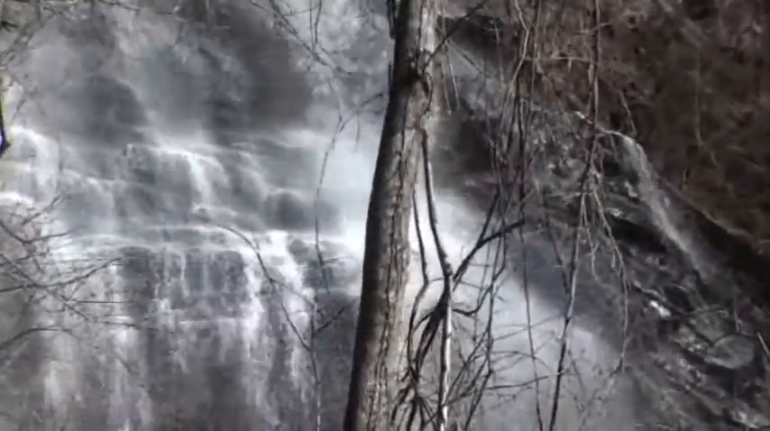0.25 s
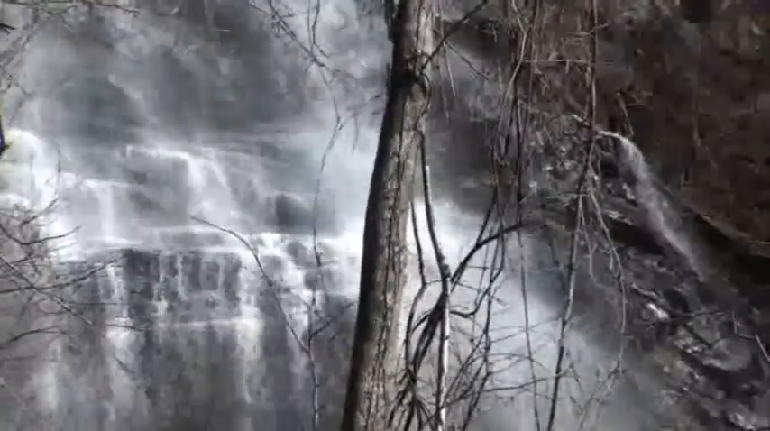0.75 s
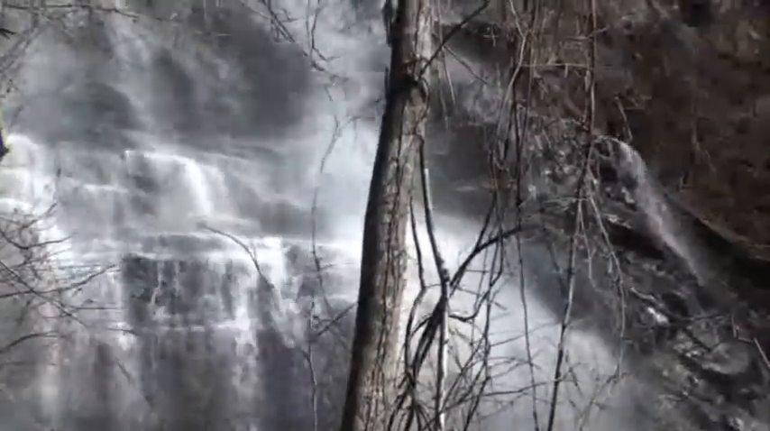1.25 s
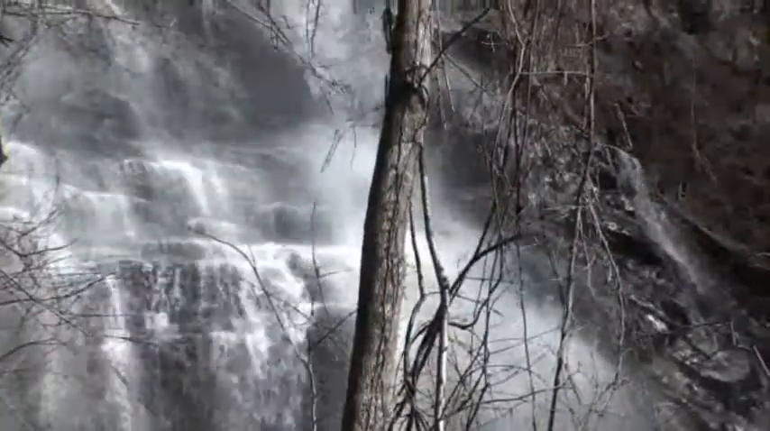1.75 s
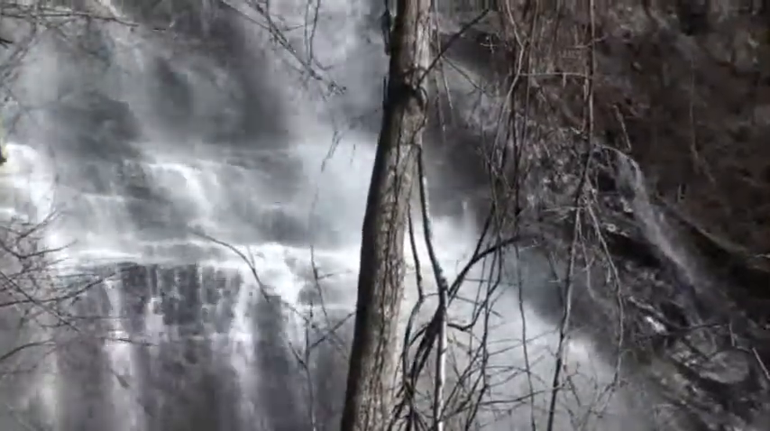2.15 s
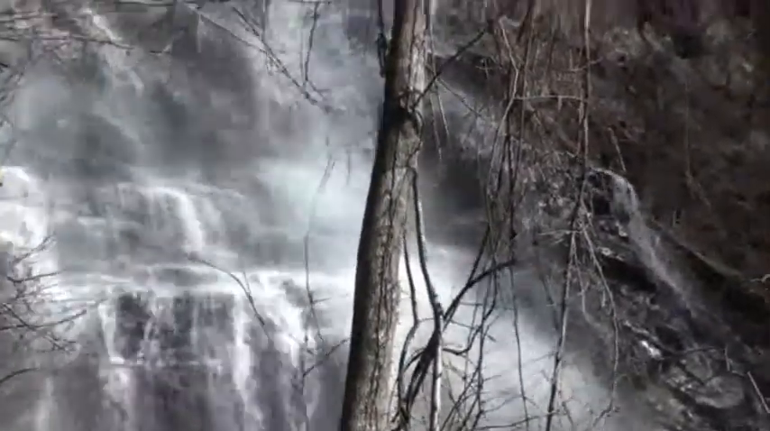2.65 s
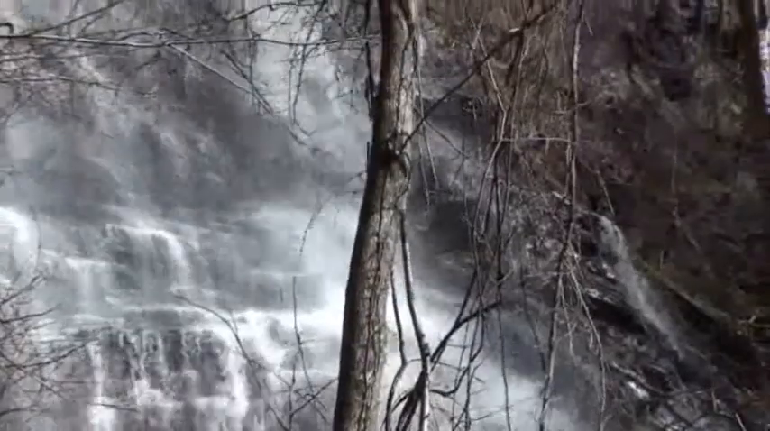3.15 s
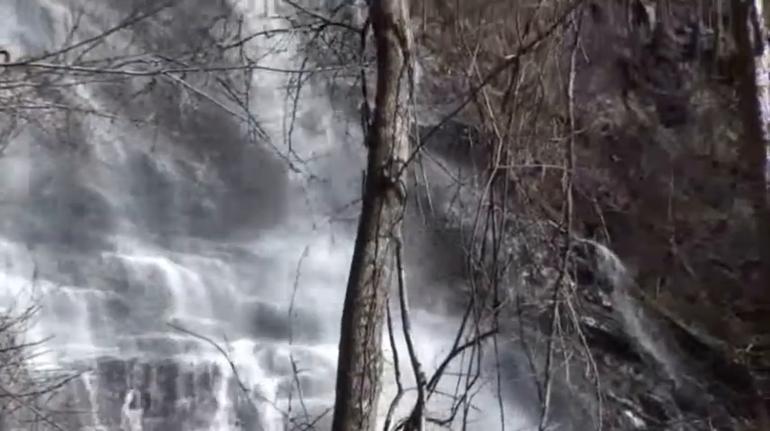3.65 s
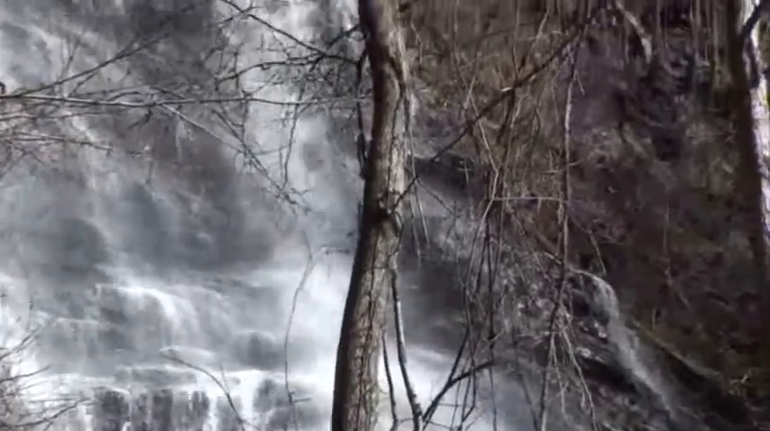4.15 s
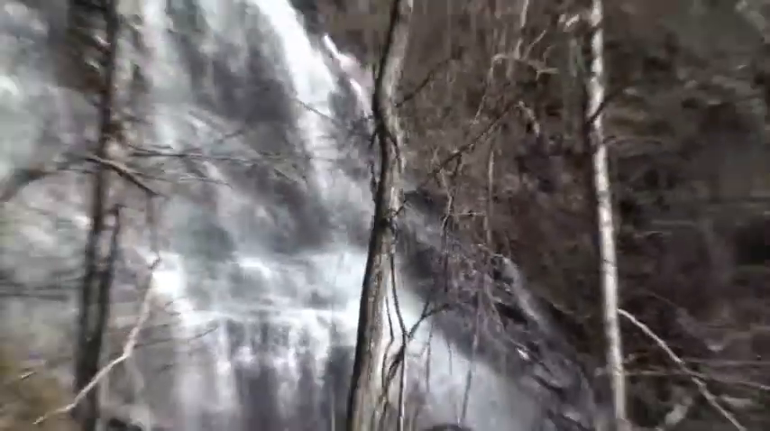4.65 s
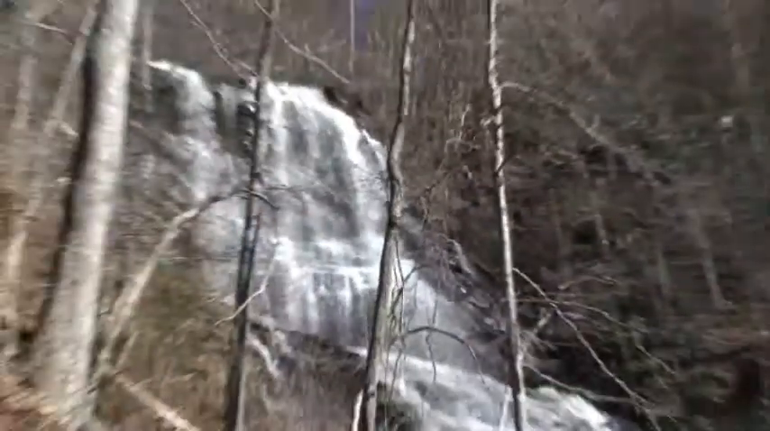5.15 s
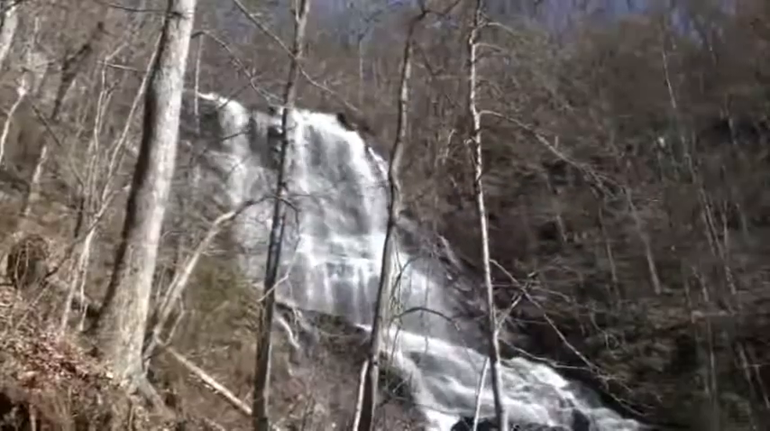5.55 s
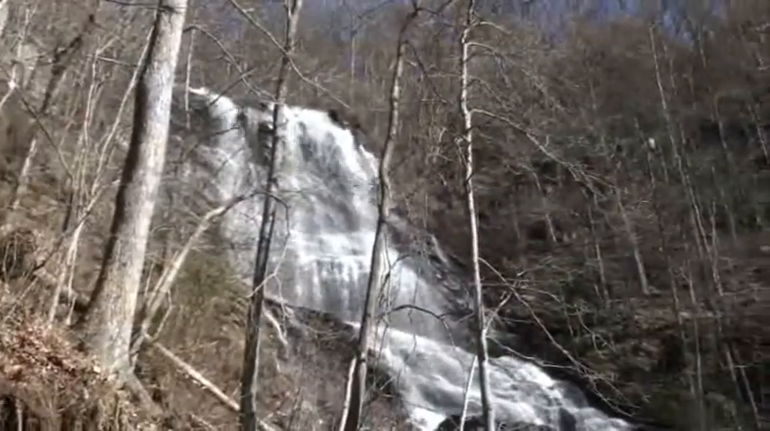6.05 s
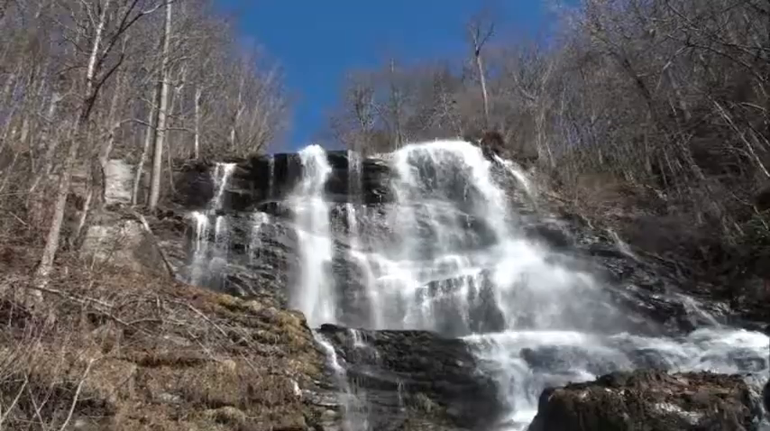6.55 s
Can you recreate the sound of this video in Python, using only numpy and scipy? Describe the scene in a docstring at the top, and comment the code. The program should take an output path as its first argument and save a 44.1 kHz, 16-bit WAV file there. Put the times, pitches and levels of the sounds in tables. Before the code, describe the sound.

From the start, a large waterfall roars loudly and steadily outdoors in a valley. Countless splashes on rock ledges and bubbling water blend into one dense rush, with a slight flutter in the low range and a smooth hiss of spray above it. The microphone is tightly focused, so the sound is almost mono and near the centre. From about 4.8 to 5.5 seconds the roar fades to a clearly softer level and widens, letting in more diffuse echo from the valley sides. It holds there, even and unbroken, until about 6.6 seconds. Then it drops out for a split second and comes straight back from a spot below the falls: somewhat louder, with a deeper rumble, and placed more to the right. This heavier roar continues for the brief remainder.

```python
"""The loud, steady roar of a large waterfall: countless splashes on rock ledges and bubbles
superpose into broadband noise, with a diffuse echo from the valley sides. A zoom microphone
hears it almost mono, then softer and wider as its beam opens. After a brief dip the scene
cuts to a second standpoint, with a deeper rumble and the water more to the right."""
import sys
import numpy as np
from scipy import signal
from scipy.fft import rfft, irfft
from scipy.io import wavfile
from scipy.ndimage import uniform_filter1d

SR = 44100
rng = np.random.default_rng(int(sys.argv[2]) if len(sys.argv) > 2 else 0)


def generate_wav(sig):
    """Save sig (samples, or channels by samples) to the path in sys.argv[1] as 16-bit PCM at SR."""
    pcm = np.round(np.clip(np.atleast_2d(sig).T, -1, 1) * 32767).astype(np.int16)
    wavfile.write(sys.argv[1], SR, pcm)


N = 300321


def water(splash_db=-7, surge_db=0.32, sheet_db=0.12, flicker_db=0.36):
    """Amplitude modulation: clumps of water surge in the low octaves while fine spray stays smooth."""
    bubble_wash = rng.standard_normal(N)
    source = rfft(bubble_wash + undb(splash_db) * splashes(per_s=8000, spread_db=2.5))
    surge, sheets = fluctuation(rate_hz=7), fluctuation(rate_hz=30)
    octave = np.clip(np.log2(bin_hz() / 60), 0, 8)
    roar = 0
    for k in range(9):
        band = irfft(source * np.maximum(1 - abs(octave - k), 0), N)
        clumping = 1 / (1 + (k / 6) ** 4)
        # sheets of water slap a ledge in all bands at once; each bubble size also flickers alone
        flicker = fluctuation(rate_hz=14)
        roar = roar + band * undb(sheet_db * sheets + clumping * (surge_db * surge + flicker_db * flicker))
    return roar


def splashes(per_s, spread_db):
    """Shot noise: random impacts on rock, most small, each scattering into droplets for a few ms."""
    hits = rng.random(N) < per_s / SR
    sizes = undb(spread_db * np.minimum(rng.exponential(size=N), 5))
    t = np.arange(400) / SR
    droplets = rfft(rng.standard_normal(len(t)) * np.exp(-t / .002), N)
    impacts = rfft(hits * sizes * rng.standard_normal(N))
    clicks = irfft(impacts * droplets / abs(droplets), N)  # all-pass: smeared in time, not coloured
    return clicks / np.std(clicks)


def waterfall(spectrum, scatter, reflection=0, comb_hz=262):
    """Direct and diffuse fields: the roar is in phase in both channels, the valley's echo in antiphase."""
    direct = colour(water(), spectrum)
    diffuse = colour(water(), spectrum)
    # comb filtering: a nearby surface repeats the echo one short path later
    diffuse = diffuse + reflection * np.roll(diffuse, int(SR / comb_hz))
    side = colour(unit_rms(diffuse), scatter)
    return unit_rms(direct) + side * np.array([[1], [-1]])


# Spectrum of the roar in the narrow beam: f/Hz, level/dB
NARROW_ROAR = [(15, -65), (25, -41), (64, -15.5), (222, -4), (348, -2), (376, -2), (766, -0.5),
               (1560, -2.5), (2200, -5.5), (2380, -5.5), (6990, -12.5), (9840, -18), (11500, -20.5),
               (13500, -31.5)]
# Valley scatter relative to that roar: f/Hz, level/dB
NARROW_ECHO = [(110, -51), (220, -21.5), (400, -24.5), (780, -16), (1200, -17.5), (1700, -49), (5000, -35),
               (12000, -24)]


def narrow_beam(level_db=-19):
    """High directivity rejects most of the diffuse field: the roar is loud and almost mono."""
    return waterfall(NARROW_ROAR, NARROW_ECHO, reflection=.45) * pan(-.3) * undb(level_db)


# Spectrum of the roar in the wide beam: f/Hz, level/dB
WIDE_ROAR = [(15, -42), (25, -26), (91, -6.5), (135, -5.5), (162, -3.5), (297, -4), (573, -4), (620, -3.5),
             (1370, -4), (1520, -5), (1780, -6), (6990, -14.5), (13500, -27.5)]
# Valley scatter relative to that roar: f/Hz, level/dB
WIDE_ECHO = [(70, -34), (200, -24), (700, -12), (1400, -10.5), (6000, -14), (11000, -8), (12500, -31)]


def wide_beam(level_db=-27.5):
    """Low directivity admits a larger share of the diffuse field: the roar is softer and wider."""
    return waterfall(WIDE_ROAR, WIDE_ECHO, reflection=.1) * pan(-.55) * undb(level_db)


def first_standpoint(t, zoom_start_s=4.82, travel_s=.7):
    """Incoherent powers add: the narrow beam fades into the wide one as the zoom pulls back."""
    zoom = np.clip(1 - (t - zoom_start_s) / travel_s, 0, 1)
    return zoom * narrow_beam() + np.sqrt(1 - zoom ** 2) * wide_beam()


# Spectrum of the roar below the falls: f/Hz, level/dB
CASCADE_ROAR = [(25, -45), (50, -19), (115, -4.5), (190, -4), (320, 0), (540, -3), (750, -7), (1000, -6),
                (1500, -8.5), (2700, -9), (4000, -15), (6500, -14), (10000, -20.5), (12000, -24),
                (13500, -33)]
# Valley scatter relative to that roar: f/Hz, level/dB
CASCADE_ECHO = [(60, -21), (250, -18), (700, -9), (1400, -7), (11000, -8), (12500, -18)]


def lower_cascade(level_db=-22.5):
    """Intensity stereophony: heard from below the falls, the rumbling cascade lies to the right."""
    return waterfall(CASCADE_ROAR, CASCADE_ECHO) * pan(-3) * undb(level_db)


def fluctuation(rate_hz):
    """Low-pass noise: random steps, averaged twice, with unit standard deviation."""
    hold = max(int(SR / rate_hz), 2)
    steps = rng.standard_normal(2048)[np.arange(N) // hold % 2048]
    smooth = uniform_filter1d(uniform_filter1d(steps, hold), hold)
    return (smooth - smooth.mean()) / smooth.std()


def colour(x, points):
    """Zero-phase filtering by a gain curve interpolated over log frequency."""
    hz, db = np.transpose(points)
    return irfft(rfft(x) * undb(np.interp(np.log(bin_hz()), np.log(hz), db)), N)


def unit_rms(x):
    """Normalisation to rms 1 above 300 Hz."""
    return x / np.std(irfft(rfft(x) * (bin_hz() > 300), N))


def pan(db):
    """Amplitude panning: channel gains for a left-minus-right level in dB."""
    return undb(np.array([[db], [-db]]) / 2)


def undb(db):
    """Amplitude ratio of a level in dB."""
    return 10 ** (np.asarray(db) / 20)


def bin_hz():
    """Fourier bin frequencies, at least 1 Hz."""
    return np.maximum(np.arange(N // 2 + 1) * SR / N, 1)


def scene(cut_s=6.6243, resume_s=6.6295, fade_s=.012):
    """Gating: the first standpoint stops dead; the second fades in a few milliseconds later."""
    t = np.arange(N) / SR
    fade_in = np.clip((t - resume_s) / fade_s, .06, 1)
    return np.where(t < cut_s, first_standpoint(t), lower_cascade() * fade_in)


def record(dry, grille_hz=12200, width_hz=1300, grille_db=4.5, cutoff_hz=13650):
    """Resonance of the microphone grille lifts the top treble; a steep low-pass cuts what lies above."""
    lift = undb(grille_db * np.exp(-((bin_hz() - grille_hz) / width_hz) ** 2))
    heard = irfft(rfft(dry) * lift, N)
    return signal.sosfilt(signal.ellip(10, .1, 80, cutoff_hz, fs=SR, output="sos"), heard)


dry = scene()
out = record(dry)
generate_wav(out)
```